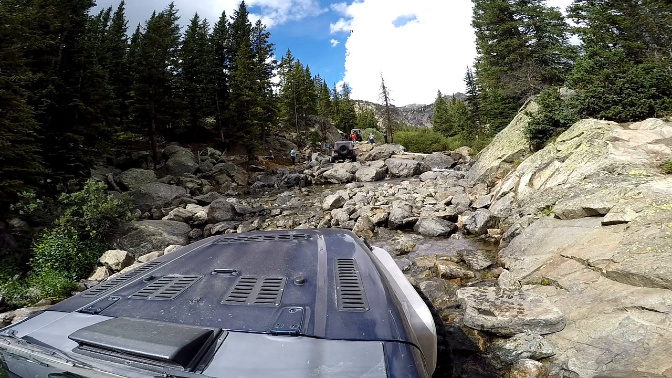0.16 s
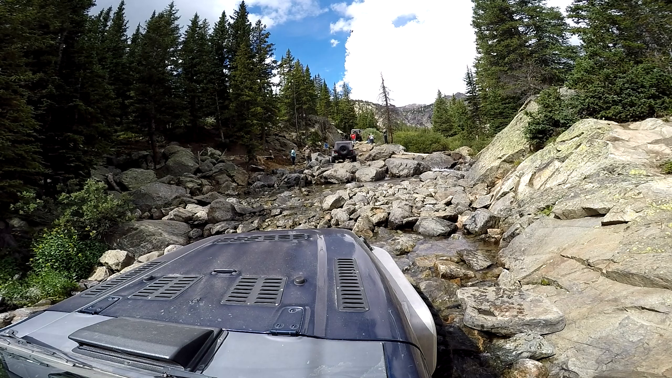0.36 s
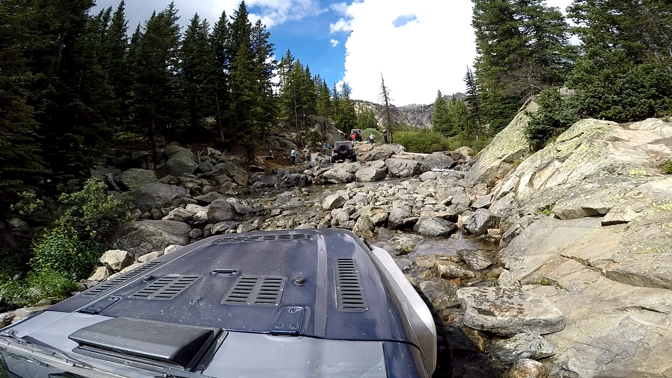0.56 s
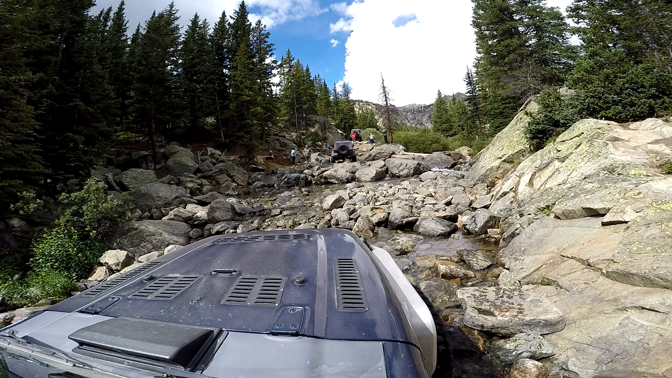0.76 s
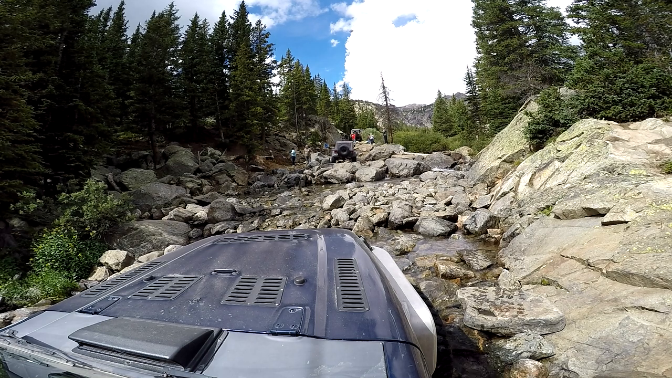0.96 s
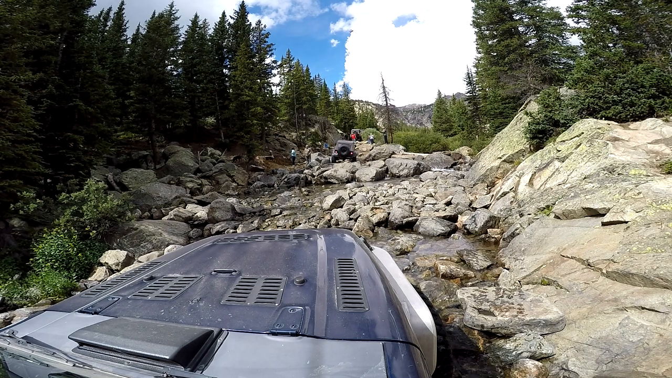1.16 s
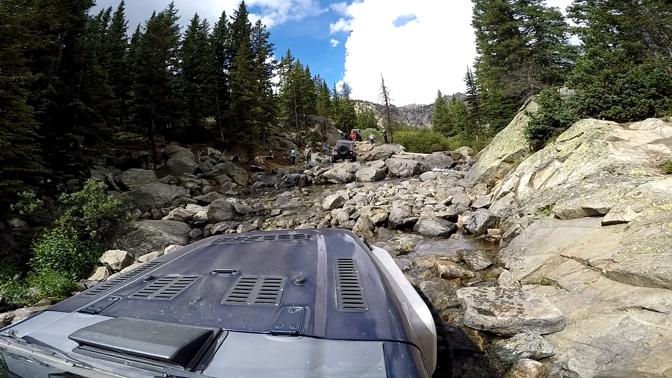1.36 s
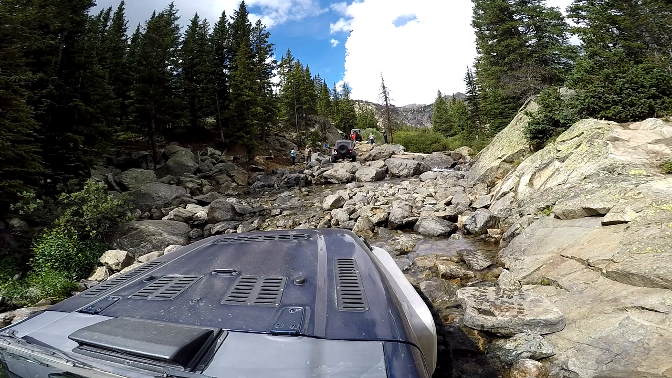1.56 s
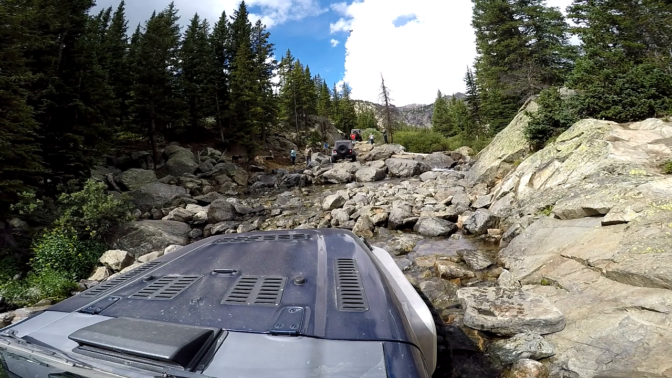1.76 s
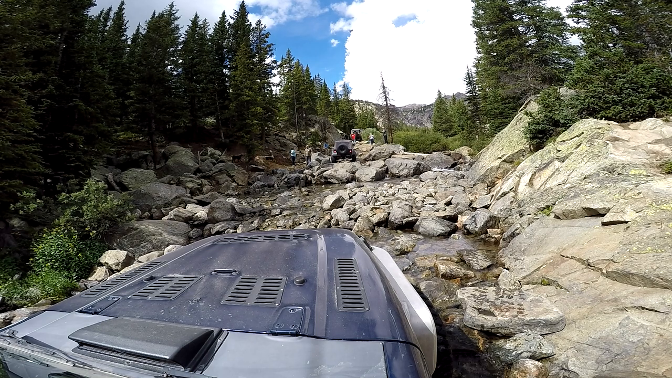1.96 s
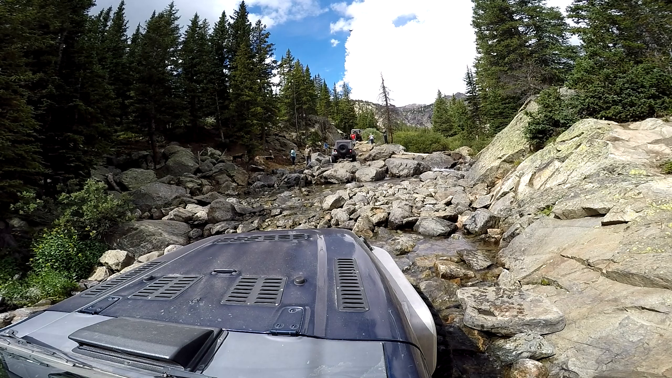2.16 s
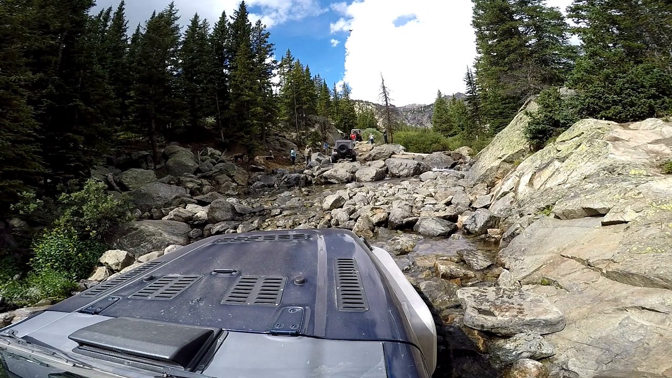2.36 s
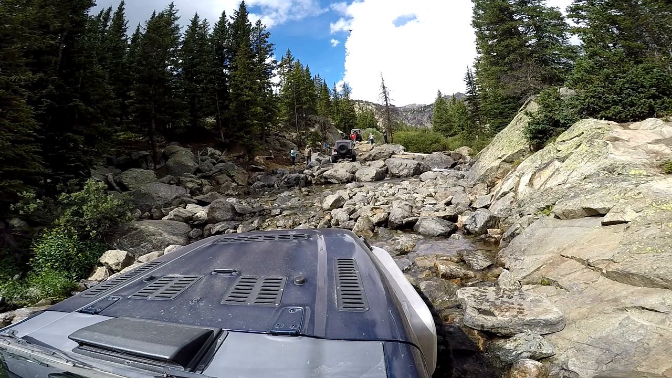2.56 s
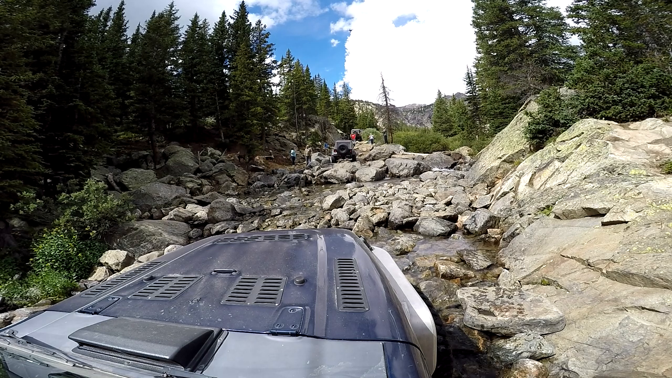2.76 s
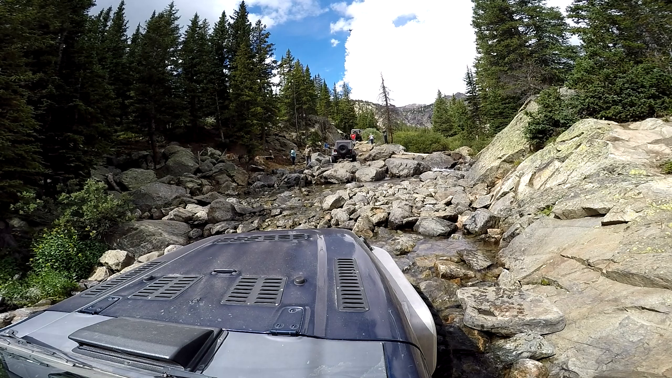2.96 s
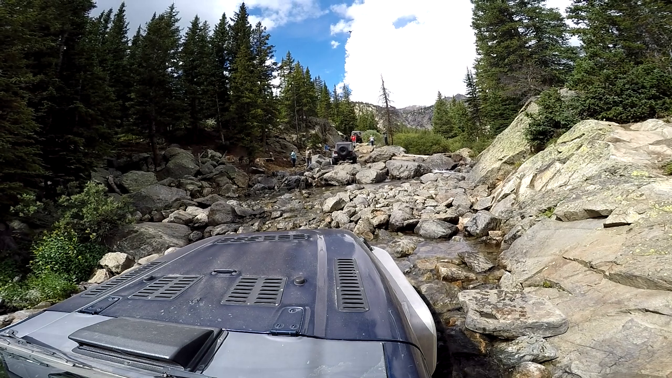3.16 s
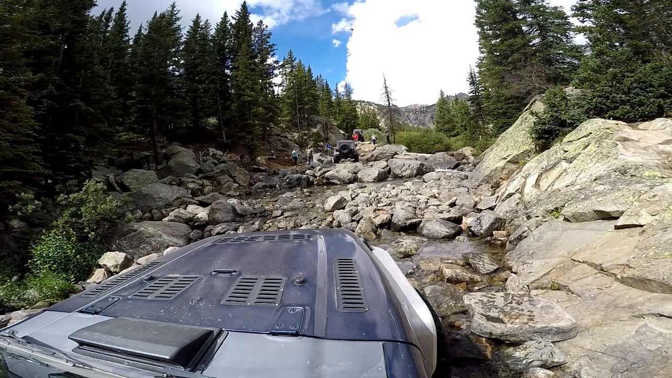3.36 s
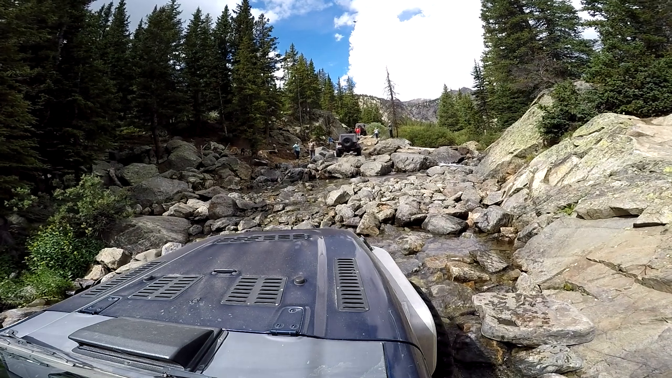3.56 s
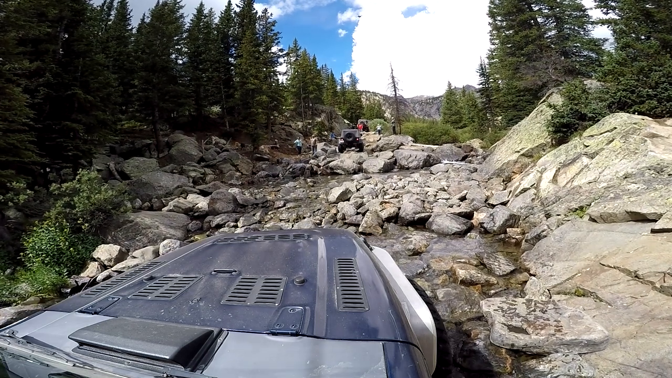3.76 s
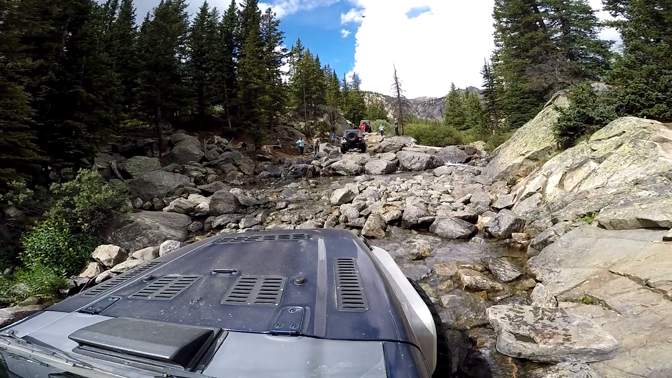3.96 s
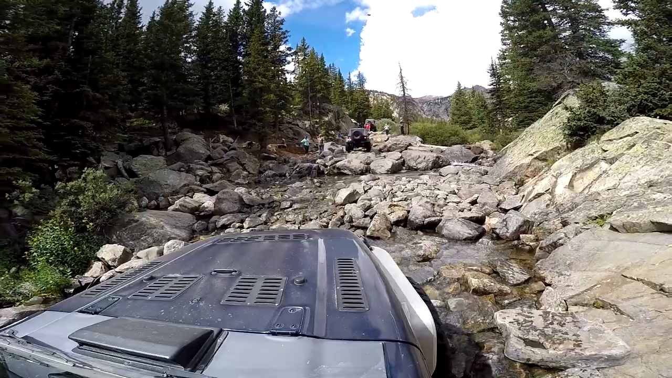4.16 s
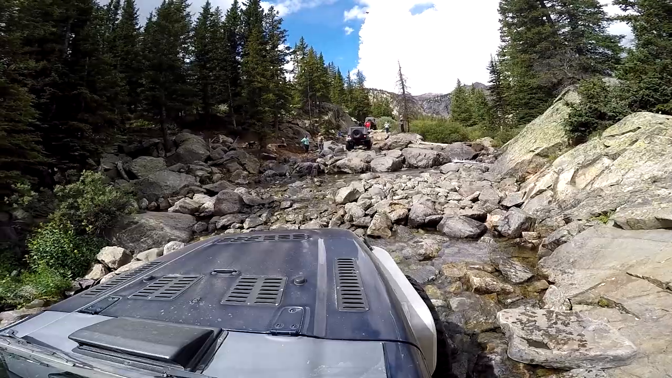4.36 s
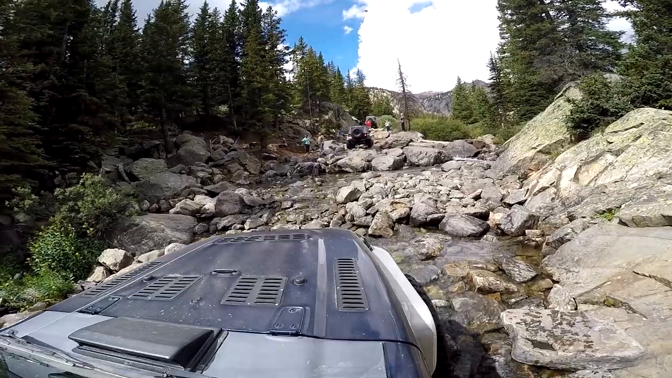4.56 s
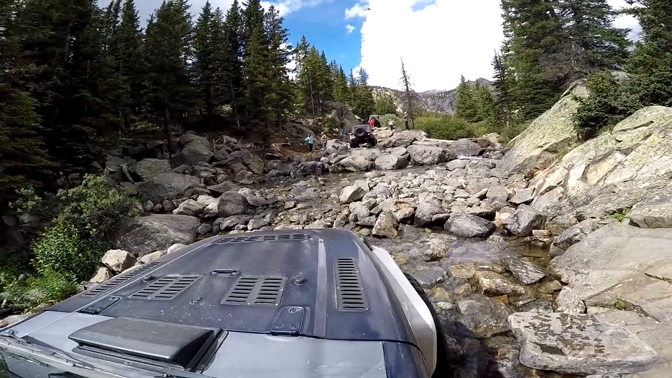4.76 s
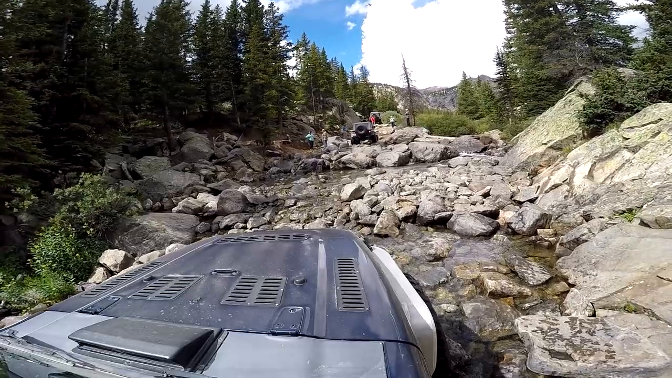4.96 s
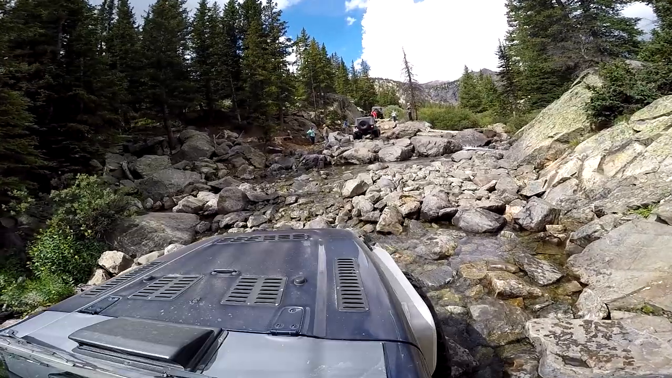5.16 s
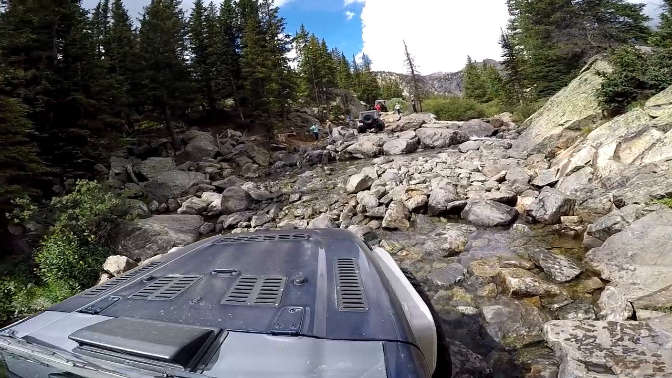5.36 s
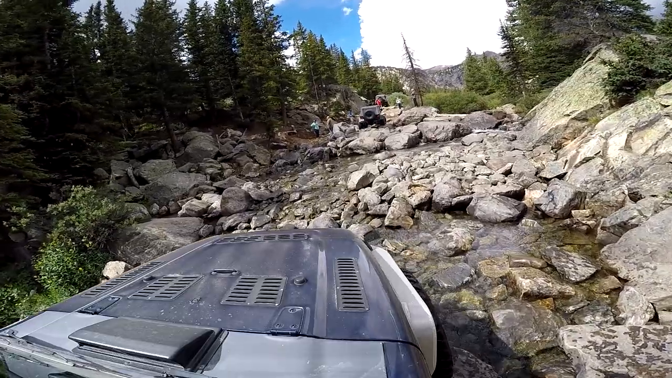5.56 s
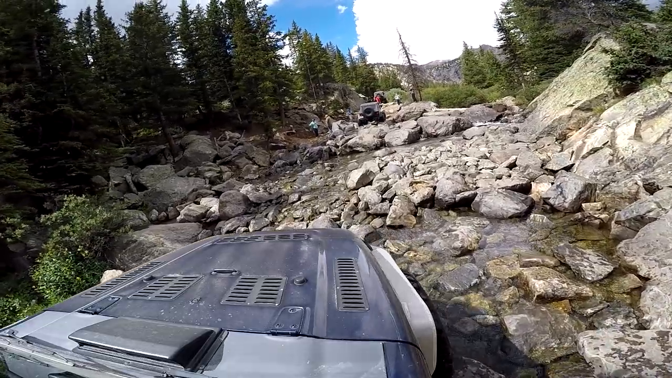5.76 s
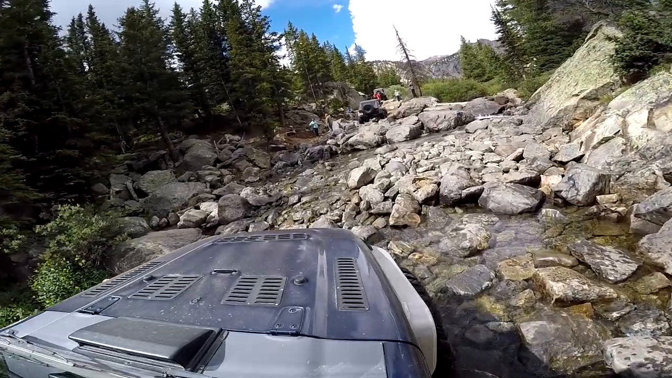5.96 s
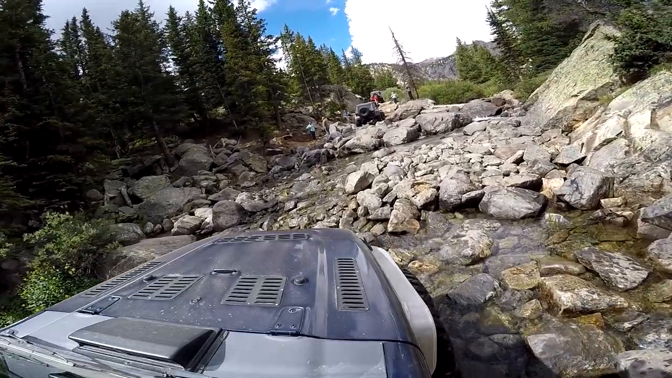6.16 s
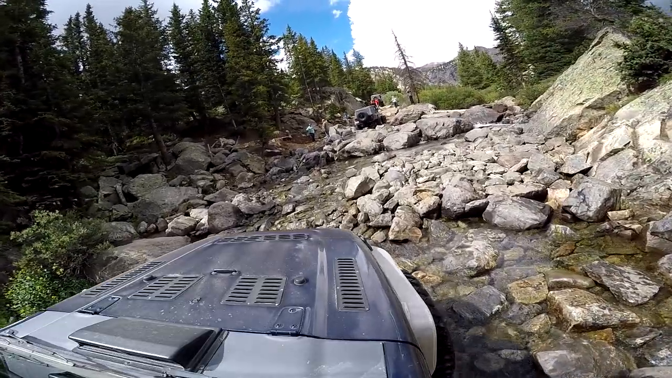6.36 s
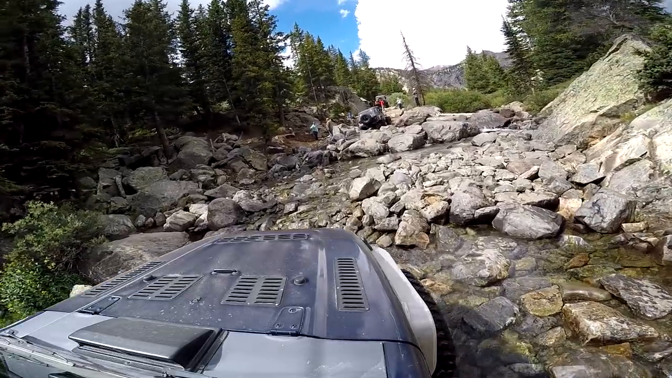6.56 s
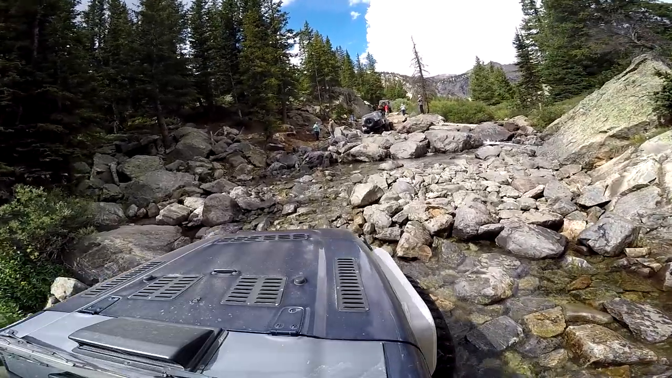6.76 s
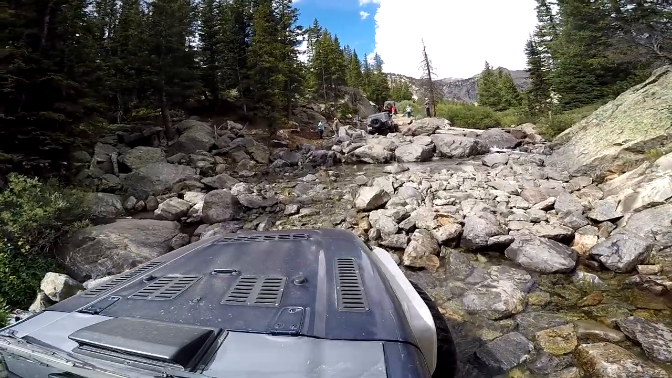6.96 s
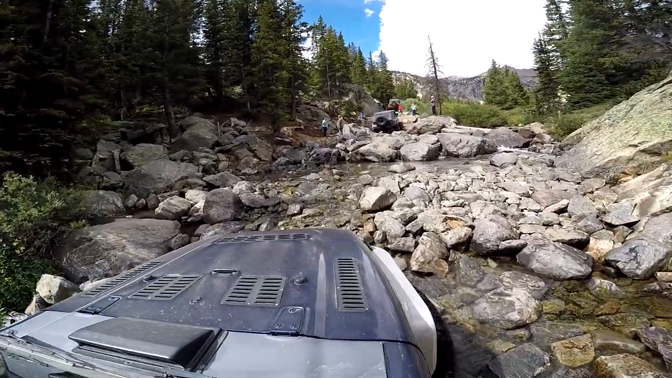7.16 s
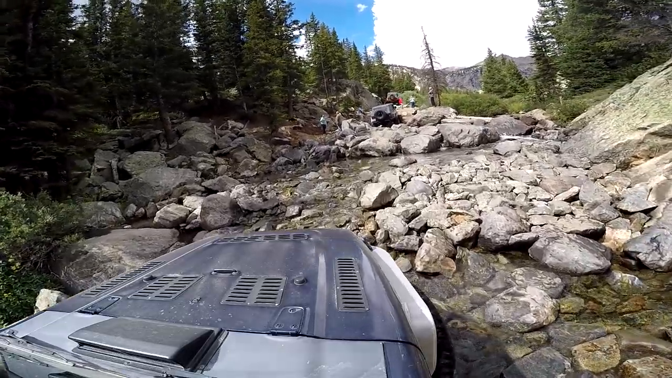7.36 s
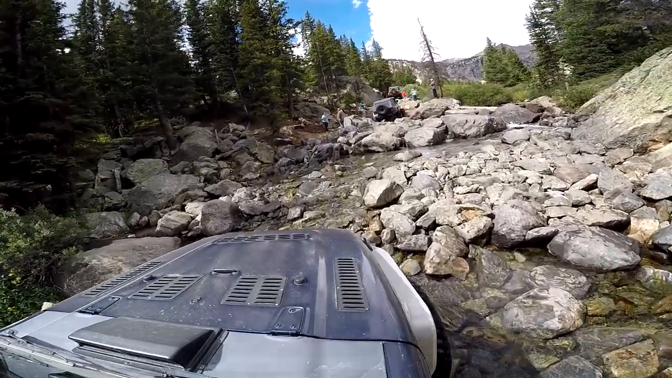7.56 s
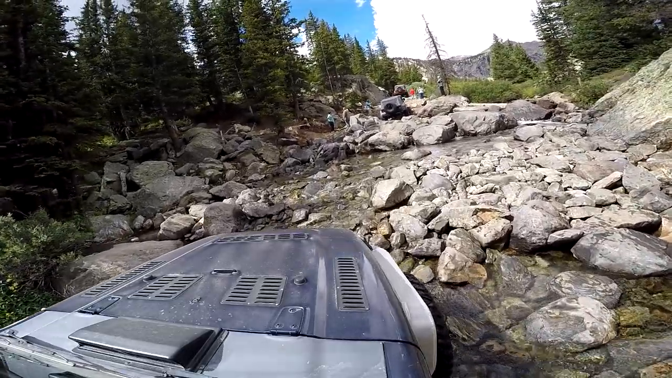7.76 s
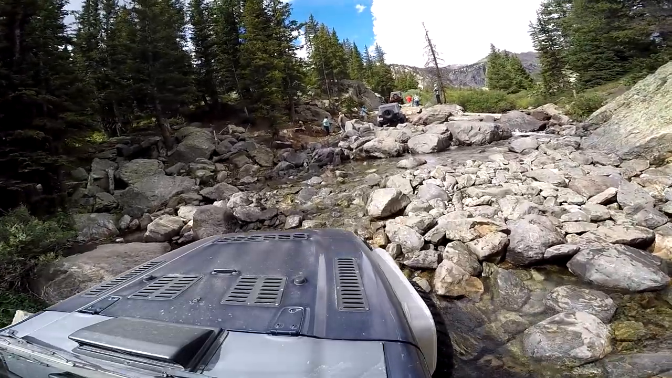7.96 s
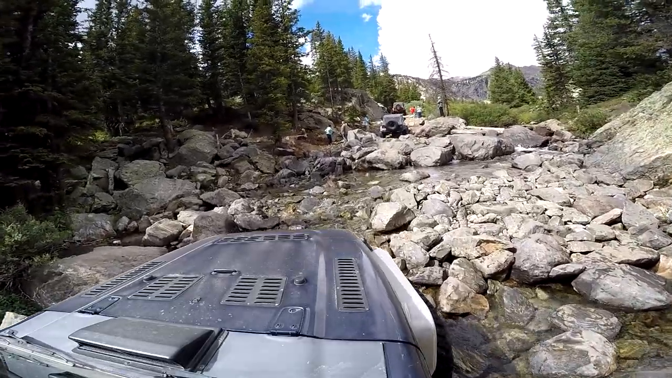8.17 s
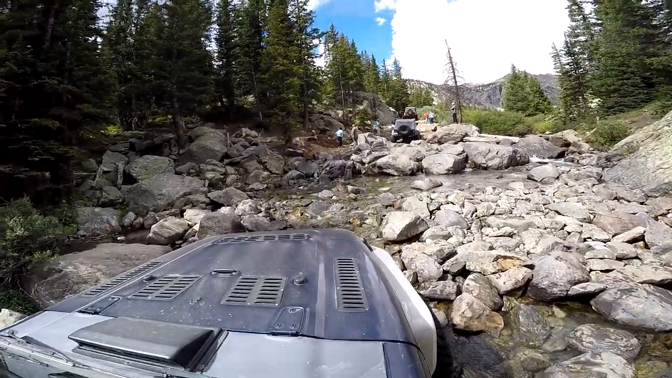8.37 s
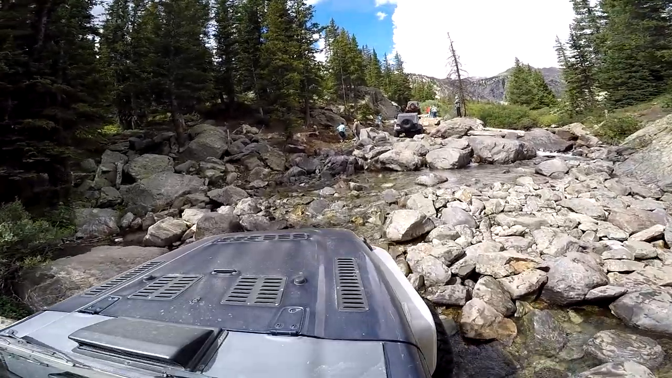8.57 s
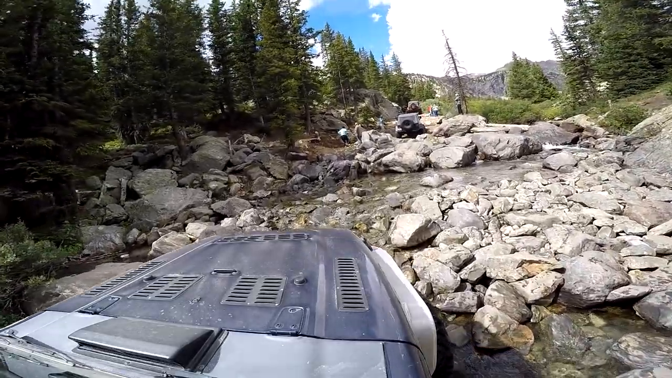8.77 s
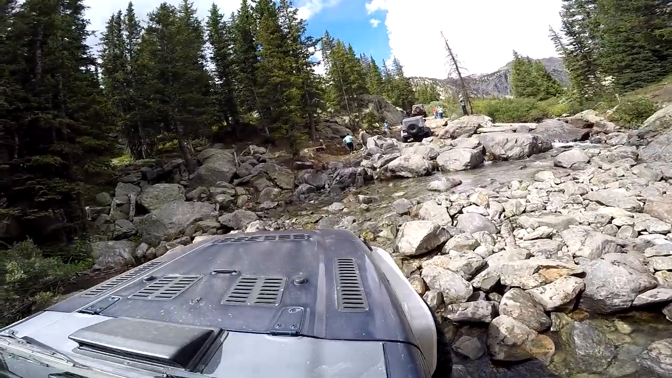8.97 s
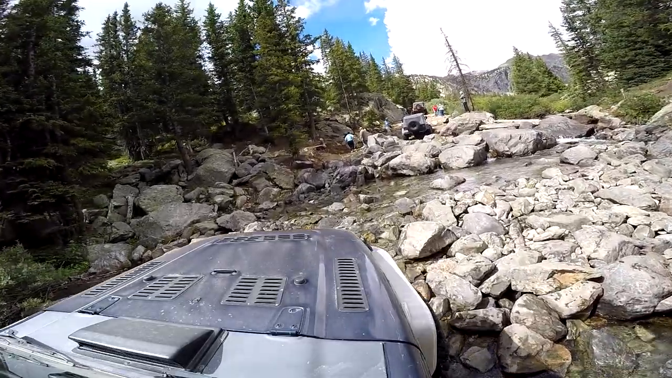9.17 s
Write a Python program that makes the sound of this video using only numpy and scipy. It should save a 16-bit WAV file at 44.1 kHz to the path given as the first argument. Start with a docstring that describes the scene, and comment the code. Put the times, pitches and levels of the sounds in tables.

```python
"""Crawling over creek boulders

A six-cylinder off-road vehicle idles, drops into gear and crawls over rocks; the microphone is fixed
to its body. The firings boom, the engine bay clatters and rasps, pump and gears whine, faint whistles
slide and a hiss swells under load. Jolts make the body sway and drum, knocks ring the frame,
loose trim ticks and the tyres grind on stone."""
import sys
import numpy as np
from scipy import signal
from scipy.fft import rfft, irfft, next_fast_len
from scipy.io import wavfile
from scipy.ndimage import uniform_filter1d, map_coordinates

SR = 44100
rng = np.random.default_rng(int(sys.argv[2]) if len(sys.argv) > 2 else 0)


def master(y):
    """Save y as 16-bit WAV."""
    cut = np.clip(np.atleast_2d(y).T, -1, 1)
    pcm = np.round(cut * 32767)  # scale
    wavfile.write(sys.argv[1], SR, pcm.astype(np.int16))


N = 407043

# The engine's run. Each row: time in seconds, firing rate in Hz, level in dB of the low tone at that
# rate. The last row is an abrupt low thump as the sound cuts off.
ENGINE_RUN = [(0.0, 31.9, -45), (0.3, 33.07, -34), (1.3, 32.9, -38), (2.7, 31.66, -40), (2.97, 33.17, -52),
              (3.3, 39.22, -26.5), (3.6, 41.4, -29), (3.85, 41.9, -36), (4.2, 42.67, -24.5),
              (4.42, 46.4, -21), (4.55, 52.84, -10.5), (4.68, 56.2, -13.5), (4.79, 57.55, -19),
              (4.9, 58.9, -16.5), (4.98, 59.4, -21.5), (5.09, 58.35, -12), (5.21, 57.34, -20),
              (5.29, 57.48, -15), (5.5, 56.95, -16), (5.62, 58.4, -15.5), (5.83, 61, -18.5),
              (5.97, 63.86, -36.5), (6.32, 58.86, -26), (6.58, 58.76, -19), (6.78, 60.75, -22),
              (6.94, 65.73, -24), (7.08, 66.13, -33), (7.54, 63.6, -31), (7.88, 60.5, -27),
              (8.06, 66.13, -36), (8.25, 65.24, -33), (8.43, 65.16, -25), (8.57, 65.33, -36),
              (8.71, 65.9, -30), (8.83, 67.6, -37), (8.95, 70.5, -32), (9.07, 69.8, -33), (9.16, 67.4, -56),
              (9.23, 65.3, -15)]
# Panel resonances of the engine bay under load. Each row: centre in Hz, width in Hz, lift in dB.
LOADED_PANELS = [(96, 6.1, -3), (124, 30, 5), (227, 72, 6), (601, 98, 11.5), (820, 99, -1.5),
                 (1177, 130, 3), (1316, 81, -9.5), (1620, 52, 4), (2307, 54, 8), (2720, 61, 0),
                 (2825, 64, 7), (2928, 92, 10), (3095, 66, 5), (3306, 100, 8), (3800, 110, 2.5),
                 (4065, 100, 8), (4540, 140, 9), (4670, 64, 5.5), (4800, 80, -2), (5000, 100, -5.5),
                 (5160, 70, -4), (5600, 200, -5.5), (5890, 120, 1), (6150, 150, -2), (6400, 200, 4),
                 (6690, 180, 7.5), (6830, 100, -7.5), (7300, 150, 1.5), (8200, 150, 3), (9100, 120, 3.5)]


def from_db(db):
    """Gain of a level in dB."""
    return 10 ** (np.asarray(db) / 20)


def joined_db(a_db, b_db):
    """Level of two unrelated sounds together."""
    return 10 * np.log10(from_db(2 * a_db) + from_db(2 * b_db))


def rms_one(x):
    """Scale to rms 1."""
    return x / np.sqrt(np.mean(x ** 2) + 1e-20)


def in_time(rows):
    """One curve per column, sample by sample, from rows that begin with a time in seconds."""
    times, *columns = np.transpose(rows)
    return [np.interp(np.arange(N) / SR, times, column) for column in columns]


def drift(rate):
    """Smooth random wander of rms 1, about rate changes a second."""
    knots = rng.standard_normal(int(N / SR * rate) + 4)
    coarse = np.arange(0, N + 32, 32)
    curve = map_coordinates(knots, [coarse / SR * rate + 1], order=3)
    return rms_one(np.interp(np.arange(N), coarse, curve))


def rise_fall(peaks, rise=294.5, fall=294.5):
    """Level in dB that climbs to each (start s, end s, dB), holds and falls; slopes in dB a second."""
    t = np.arange(0, N, 64) / SR
    power = sum(from_db(2 * (db - rise * np.maximum(start - t, 0) - fall * np.maximum(t - end, 0)))
                for start, end, db in peaks)
    return np.interp(np.arange(N) / SR, t, 10 * np.log10(power + 1e-14))


def tone(hz, db, multiple=1):
    """A sine that follows a multiple of a pitch curve, at an rms level."""
    return np.sqrt(2) * from_db(db) * np.sin(2 * np.pi * (multiple * np.cumsum(hz) / SR + rng.random()))


def passing_orders(rows, firing_hz, flicker_db=0):
    """Tones that fade in, follow the engine speed and fade out."""
    return sum(tone(firing_hz, rise_fall([(start, start + length, db)]) + flicker_db, multiple)
               for start, length, db, multiple in rows)


def ring(x, hz, t60):
    """One damped mode: a unit click sets a sine of height 1 ringing."""
    r, w = from_db(-60 / (t60 * SR)), 2 * np.pi * hz / SR
    return signal.lfilter([0, np.sin(w)], [1, -2 * r * np.cos(w), r * r], x + 1e-18)


def bell(hz, centre, width):
    """A resonance curve of height 1, its width taken at half height."""
    return 1 / (1 + (2 * (hz - centre) / width) ** 2)


def panel_lift_db(hz, panels):
    """What the panels add or take away at each frequency."""
    return sum(db * bell(hz, centre, width) for centre, width, db in panels)


def shaped(gain_at):
    """Noise of rms 1, coloured by a gain for each frequency."""
    size = next_fast_len(N)
    hz = np.maximum(np.arange(size // 2 + 1) * SR / size, 1)
    return rms_one(irfft(rfft(rng.standard_normal(size)) * gain_at(hz), size)[:N])


def band_noise(bands):
    """Noise of rms 1 in bands of (centre Hz, width Hz, relative dB)."""
    return shaped(lambda hz: sum(from_db(db) * bell(hz, centre, width) for centre, width, db in bands))


def engine(firing_hz, low_tone_db):
    """The firings boom, uneven at speed; unequal cylinders add weaker orders. A low thump ends it."""
    # The weaker orders. Each row: firing rate in Hz, then the level in dB of each of the five.
    side_orders = [(33, -33, -35, -38.5, -38, -50), (35.7, -62, -37, -60, -41, -68),
                   (42.9, -64, -42, -60, -42, -79), (52.7, -67, -44, -65, -50, -71),
                   (57.5, -71, -43, -64.5, -44, -76), (60.48, -71.5, -44, -66, -46, -77),
                   (63.2, -71.5, -50, -66, -48, -79), (65, -67, -51, -68.5, -48, -80)]
    multiples = 5, 9, 10, 12, 15   # of the cycle rate, a sixth of the firings
    wavers_db = 1.5, 4.3, 4.86, 1.5, 3.0
    uneven_db = np.interp(firing_hz, (60, 65), (0.8, 2.0))
    out = tone(firing_hz, low_tone_db + uneven_db * drift(9.7))
    speeds_hz, *levels_db = np.transpose(side_orders)
    for multiple, db, waver_db in zip(multiples, levels_db, wavers_db):
        out += tone(firing_hz, np.interp(firing_hz, speeds_hz, db) + waver_db * drift(4), multiple / 6)
    return out


def shaken(modes, level_db, steady):
    """Random shaking through steep body modes; steady (0-1) evens out its chance swells."""
    shaking = band_noise(modes)
    swell = np.sqrt(uniform_filter1d(uniform_filter1d(shaking ** 2, size=3000), size=3000))
    return from_db(level_db) * rms_one(shaking / swell ** steady)


def body(jolt_sway_db, jolt_drum_db):
    """Rolling shakes the body under the microphone; jolts make it sway and drum harder."""
    # Body modes. Each row: centre in Hz, width in Hz, relative level in dB.
    sway_modes = [(17.6, 6.9, -5.5), (31.2, 5, 6), (39.7, 3.9, -1)]
    drum_modes = [(52.07, 4.1, 2.5), (71.4, 20, -25.5)]
    # Shaking between jolts. Each row: time in seconds, sway in dB, drumming in dB.
    rolling = [(0, -36, -50), (2.4, -61, -39), (3.0, -39, -32), (4.3, -39.5, -26.5), (5.5, -30.5, -28.5),
               (7, -32, -32), (9.23, -29.5, -32)]
    sway_db, drum_db = in_time(rolling)
    sway = shaken(sway_modes, joined_db(sway_db, jolt_sway_db), steady=1.0)
    return sway + shaken(drum_modes, joined_db(drum_db, jolt_drum_db), steady=0.37)


def coloured_noise(colour, peaks, band=None):
    """Noise with a broad colour and narrow peaks and dips, whole or in one band (low Hz, high Hz)."""
    points_hz, points_db = np.transpose(colour)

    def gain_at(hz):
        gain = from_db(np.interp(np.log(hz), np.log(points_hz), points_db) + panel_lift_db(hz, peaks))
        if band is None:
            return gain
        below_low, below_high = (1 / (1 + (hz / edge) ** 8) for edge in band)
        return gain * np.sqrt(np.abs(below_high - below_low))
    return shaped(gain_at)


def engine_bay(firing_hz, jolt_sway_db):
    """A steady bed and four flickering ranges that follow effort and speed throb with the firings."""
    # Steady bed: engine-bay noise at idle, with faint microphone hiss above 8 kHz.
    # Each row: frequency in Hz, relative level in dB.
    bed_colour = [(44, -29), (75, -1), (92, -17), (128, -14.5), (146, -33), (227, -28.5), (324, -30.5),
                  (362, -18), (442, -35.5), (505, -30.5), (1340, -37.5), (2230, -26.5), (2780, -39.5),
                  (5180, -43.5), (11800, -56.5), (14100, -54), (14600, -61.5), (15300, -71)]
    # The bed's peaks and dips. Each row: centre in Hz, width in Hz, lift in dB.
    bed_peaks = [(375, 8.7, 6.5), (550, 150, 2), (853, 46, -6), (1136, 61, 8), (1365, 120, -7),
                 (1523, 170, 6), (2150, 97, -3.5), (2880, 140, -14.5), (3100, 100, 3), (3450, 150, -2),
                 (4040, 80, 6), (4310, 79, 8), (4600, 190, -2), (5060, 100, -2.5), (5070, 140, 10),
                 (6560, 160, 3.5), (6850, 62, 6.5), (9500, 150, 3.5), (14250, 250, 4)]
    # The bay under load. Each row: frequency in Hz, relative level in dB.
    load_colour = [(44, -18), (75, -9), (98, -17), (213, -19.5), (310, -28), (346, -26), (673, -37),
                   (1200, -33), (1340, -34.5), (2330, -32), (3880, -48), (4630, -40.5), (15000, -68.5)]
    # The engine's work. Each row: time in seconds, then effort, low rumble and treble in dB above idle.
    effort = [(0, -0.5, -0.5, 3.5), (1.7, 0, -1, 0.5), (2.3, -1, 0.5, 2), (2.52, 1, 7, 1), (2.8, 1, 4, 4),
              (3.25, 1, 5, 4.5), (3.7, 2.5, 5.5, 2), (3.95, 0.5, 0.5, 2.5), (4.45, 3, 9, 7),
              (4.95, 6, 5.5, 10.5), (5.45, 5, 6, 10.5), (5.7, 6, 3.5, 10.5), (6.0, 6.5, 5, 13),
              (6.45, 5.5, 6, 11), (6.9, 7, 9, 12.5), (7.5, 6, 5, 15), (7.9, 6, 9, 13), (8.24, 7, 8.5, 13.5),
              (8.65, 5.5, 8, 12), (9.23, 7.5, 4.5, 16)]
    # Thrum, rumble, clatter and sizzle. Each row: level at idle in dB, dB per dB of effort, of rumble
    # and of treble, dB per doubling of speed, flicker in dB.
    ranges = [(-54.5, 0.65, 0.39, 0.33, 0.5, 0.98), (-57.5, 0.06, 1, 0.034, -0.5, 1.6),
              (-58, 1, 0, 0.027, 2.5, 0.46), (-69.5, 0.064, 0, 0.87, 0.5, 0.65)]
    idle_hz, edges_hz = 33, (1e-3, 316, 526, 3300, 1e9)
    controls_db, doublings = np.array(in_time(effort)), np.log2(firing_hz / idle_hz)
    levels_db = [idle_db + np.dot(shares, controls_db) + speed_db * doublings + flicker_db * drift(12)
                 for idle_db, *shares, speed_db, flicker_db in ranges]
    levels_db[0] = joined_db(levels_db[0], jolt_sway_db - 21)   # jolts add thrum
    out = from_db(-47 + 0.21 * drift(9)) * coloured_noise(bed_colour, bed_peaks)
    for level_db, band in zip(levels_db, zip(edges_hz, edges_hz[1:])):
        out += from_db(level_db) * coloured_noise(load_colour, LOADED_PANELS, band)
    throb = 1 + 0.073 * np.sin(2 * np.pi * np.cumsum(firing_hz) / SR)
    return throb * out


def valve_rasp():
    """The valve gear rasps in one band, surging unevenly some twenty times a second."""
    noise = shaped(lambda hz: bell(hz, centre=2280, width=220))
    return from_db(-66 + 3.5 * drift(20)) * noise


def whistles():
    """Faint, thin tones slide evenly in pitch, wavering."""
    # Each row: start in seconds, length in seconds, level in dB, first and last pitch in Hz.
    glides = [(0, 1.95, -78, 5040, 5330), (2.4, 1.5, -81, 5100, 4960), (2.92, .42, -71, 900, 920),
              (3.4, .33, -67, 950, 985), (3.9, .25, -70, 975, 985), (4.8, .25, -72, 4575, 4600)]
    out, t = np.zeros(N), np.arange(N) / SR
    waver, flicker_db = 1 + 0.005 * drift(30), 4 * drift(15)
    for start, length, db, from_hz, to_hz in glides:
        hz = waver * np.interp(t, [start, start + length], [from_hz, to_hz])
        out += tone(hz, rise_fall([(start, start + length, db)]) + flicker_db)
    return out


def trim_ticks():
    """Loose trim hits and bounces once, with its own strength on every mode."""
    # The ticks. Each row: start in seconds, level in dB.
    ticks = [(0.384, -47), (3.7936, -33), (3.8288, -47), (3.8358, -33), (5.037, -35), (5.052, -41),
             (5.0903, -40.5), (5.1234, -38), (5.1598, -36.5), (5.188, -44), (5.2131, -47), (5.278, -39),
             (5.3561, -46), (5.4094, -41.5), (6.6652, -44), (6.7369, -40), (7.7366, -37), (7.7443, -36.5),
             (7.9572, -41), (8.014, -42), (8.134, -41), (8.5934, -45)]
    # Trim modes. Each row: frequency in Hz, relative level in dB, t60 in seconds.
    modes = [(1090, -2, 0.0085), (1335, 3, 0.0072), (1980, -4.5, 0.023), (2314, 4, 0.017),
             (2550, -1, 0.015), (4600, -29, 0.0073)]
    starts, levels_db = np.transpose(ticks)
    at, bounce = np.round(starts * SR).astype(int), int(0.00381 * SR)
    spread_db = 1.8 * rng.standard_normal((len(ticks), len(modes), 2))
    out = np.zeros(N)
    for k, (hz, db, t60) in enumerate(modes):
        clicks = np.zeros(N)
        clicks[at] = from_db(levels_db + db - 1.5 + spread_db[:, k, 0])
        clicks[at + bounce] = from_db(levels_db + db - 8.0 + spread_db[:, k, 1])
        out += (-1) ** k * ring(clicks, hz, t60)
    return out


def wheel_jolts():
    """Levels of sway and drumming in dB, a quick swell and fall as a wheel meets each rock."""
    # The jolts. Each row: time in seconds, sway in dB, drumming in dB.
    jolts = [(1.1, -53, -26.5), (1.6, -35, -24.5), (1.87, -45, -23.5), (2.52, -29.5, -31), (2.82, -33, -26),
             (3.101, -19.5, -18.5), (3.4, -28, -44), (3.6, -22.5, -28), (3.8, -30, -23), (4.0, -29, -27),
             (4.9, -40.5, -27.5), (5.3, -37, -23), (5.65, -40, -27), (5.95, -26.5, -22.5),
             (6.4, -18.5, -38), (6.6, -35, -16), (6.8, -28, -19), (6.97, -37, -17.5), (7.1, -22.5, -32),
             (7.501, -34, -13.5), (7.6, -16.5, -22), (7.8, -20.5, -42), (8.0, -19, -18.5),
             (8.099, -23, -16.5), (8.28, -26.5, -22), (8.4, -42, -16), (8.5, -16, -17.5), (8.7, -19.5, -37),
             (8.9, -31, -20.5), (9.1, -22, -36)]
    times, *levels_db = np.transpose(jolts)
    return [rise_fall(zip(times, times, db), rise=161.5, fall=138) for db in levels_db]


def frame_knocks():
    """A short contact swings every frame mode; a dying rattle keeps them going."""
    # The knocks. Each row: start in seconds, level in dB of the low, middle, high and top modes,
    # lean within the pairs of modes in dB, contact in seconds, relative rattle in dB.
    knocks = [(1.5078, -29, -29, -26, -41.5, 7, 0.007, -21), (1.549, -49, -46, -44, -61, 1, 0.0063, -1),
              (1.691, -45, -51, -42, -53, -3, 0.0075, -12), (1.735, -49, -52, -47, -60, -8, 0.007, -16),
              (2.47, -38, -46.5, -61, -64, -3, .012, -5), (2.515, -43, -43, -48, -65, -3, 0.011, -2.5),
              (2.54, -33.5, -42, -44, -49, 6, 0.0084, -2),
              (3.0225, -47, -30, -29.5, -59, -4.5, 0.003, -8.5),
              (3.032, -26, -46, -44, -59, -23, 0.0083, -7), (3.83, -39, -58, -43, -50, -3, 0.0061, -4),
              (4.069, -41, -50, -46, -56, -9, 0.0076, -4.5),
              (4.7203, -36, -56, -21, -49, -5.5, 0.0052, -18), (5.507, -48, -53, -46, -53, -6, 0.0077, -11),
              (5.539, -52, -45, -36.5, -46, -1, .005, -9.5),
              (6.143, -37, -56, -34.5, -35.5, -5, 0.0044, -7), (6.569, -56, -59, -43, -53, -12, .012, -6),
              (6.786, -33, -49, -51, -58, -3, 0.011, -18), (7.7335, -28, -48, -48, -37, 6, 0.0045, -18),
              (7.7422, -45, -36.5, -44, -41, -15.5, 0.004, -16),
              (7.847, -36.5, -45, -52, -55, 3, 0.0097, -2.5), (8.006, -43, -42, -52, -57, 10, .0086, -16)]
    # Frame modes. Each row: frequency in Hz, t60 in seconds.
    modes = [(187, 0.076), (235, 0.056), (390, 0.031), (465, 0.03), (545, 0.036), (612, 0.068),
             (1130, 0.012)]
    # For each mode: which of the four levels it takes, and its share of the lean.
    mode_group = 0, 0, 1, 1, 2, 2, 3
    mode_lean = -0.36, 0.52, 0.2, -0.56, 0.28, 0.05, -0.23
    out, t = np.zeros(N), np.arange(8000) / SR
    rattle_fade = np.exp(-t / 0.037)
    grit = rng.standard_normal((len(knocks), len(modes), len(t)))
    for k, (hz, t60) in enumerate(modes):
        force, fade_samples = np.zeros(N), t60 * SR / np.log(1000)
        for (start, *group_db, lean_db, contact_s, rattle_db), noise in zip(knocks, grit):
            swing = (t < contact_s) * np.sin(2 * np.pi * hz * t) * 2 / min(fade_samples, contact_s * SR)
            rattle = from_db(rattle_db) * rattle_fade * noise[k] * np.sqrt(2 / fade_samples)
            strength = from_db(group_db[mode_group[k]] + mode_lean[k] * lean_db)
            at = round(start * SR)
            force[at:at + len(t)] += strength * (swing + rattle)
        out += ring(force, hz, t60)
    return out


def pump_whine(firing_hz):
    """A pump's high whines come and go, wavering around the engine's speed."""
    # Each row: start in seconds, length in seconds, level in dB, multiple of the firing rate.
    whines = [(1.6, .82, -68.5, 34.5), (4.37, .015, -56, 24.3), (6.82, 1.03, -62, 24.9),
              (7.95, .9, -61, 24.9)]
    return passing_orders(whines, firing_hz * (1 + 0.006 * drift(30)), flicker_db=2.5 * drift(15))


def tyre_grinds():
    """Tyres grind on rock: sudden bursts of uneven grit, heard through panels and wheel wells."""
    # Each row: start in seconds, seconds to half height, level in dB, tilt in dB per octave.
    grinds = [(1.887, 0.022, -54, 0.5), (3.186, 0.027, -51, -13), (4.725, 0.037, -44, -13),
              (5.273, 0.017, -47, -18), (5.819, 0.062, -50.5, -2), (7.732, 0.018, -39, -8),
              (7.955, 0.032, -45, -5), (7.985, 0.055, -48.5, -8), (8.041, 0.041, -54, -1),
              (8.131, .012, -46, -7)]
    out, size = np.zeros(N), 8192
    t, hz = np.arange(size) / SR, np.arange(1, size // 2 + 2) * SR / size
    grit = rng.standard_normal((len(grinds), size))
    grit *= from_db(2.2 * rng.exponential(1, grit.shape))   # a few grains stand out
    wheel_well_db = 12.7 * bell(hz, centre=2150, width=900)
    lift_db = panel_lift_db(hz, LOADED_PANELS) + wheel_well_db
    passband = 1 / (1 + (1100 / hz) ** 4) / (1 + (hz / 8000) ** 4)
    for (start, length, db, tilt_db), grains in zip(grinds, grit):
        colour = from_db(lift_db + tilt_db * np.log2(hz / 2000)) * passband
        envelope = np.clip(t / 0.003, 0, 1) / (1 + (t / length) ** 4)
        at = round(start * SR)
        out[at:at + size] += from_db(db) * envelope * rms_one(irfft(rfft(grains) * colour))
    return out


def bay_hiss():
    """Two narrow bands of hiss in the engine bay swell and sink under load."""
    # The bands. Each row: centre in Hz, width in Hz, relative level in dB.
    bands = [(4595, 120, 2.5), (6500, 300, -12)]
    # The swells. Each row: start and end in seconds, level in dB.
    swells = [(4.85, 5.0, -67), (5.85, 6.0, -65), (6.95, 7.5, -62.5), (7.7, 7.75, -64), (8.1, 8.25, -63),
              (8.55, 8.6, -62), (8.98, 9.15, -62)]
    return band_noise(bands) * from_db(rise_fall(swells, rise=41, fall=41) + 1.5 * drift(8))


def boom(firing_hz):
    """A low engine order swells briefly."""
    # Each row: start in seconds, length in seconds, level in dB, multiple of the firing rate.
    swells = [(5.46, 0.11, -33.5, 1.53)]
    return passing_orders(swells, firing_hz)


def gear_whine(firing_hz):
    """The gears whine under load, their pitch tied to the firing rate."""
    # Each row: start and end in seconds, level in dB.
    whines = [(6.95, 7.22, -48.5), (7.3, 7.55, -53), (8.03, 8.72, -50), (8.74, 8.84, -46.5),
              (8.96, 9.3, -48)]
    wavering_hz = firing_hz * (1 + 0.004 * drift(10))
    return tone(wavering_hz, rise_fall(whines) + 2 * drift(12), multiple=5.25)


def scene():
    """Everything reaches one microphone at close range, through the vehicle's body."""
    firing_hz, low_tone_db = in_time(ENGINE_RUN)
    sway_db, drum_db = wheel_jolts()
    drive = engine(firing_hz, low_tone_db) + gear_whine(firing_hz)
    drive += boom(firing_hz) + pump_whine(firing_hz)
    shaking = body(sway_db, drum_db) + engine_bay(firing_hz, sway_db)
    contacts = frame_knocks() + trim_ticks() + tyre_grinds()
    return (drive + shaking + contacts + whistles() + bay_hiss() + valve_rasp())[None]


def record(dry):
    """The microphone rolls off below 12 Hz and the top is cut steeply by 15.6 kHz."""
    dry = signal.sosfilt(signal.butter(2, 12.0, "high", fs=SR, output="sos"), dry)
    return signal.sosfilt(signal.cheby2(20, 60, 15600, fs=SR, output="sos"), dry)


dry = scene()
out = record(dry)
master(out)
```